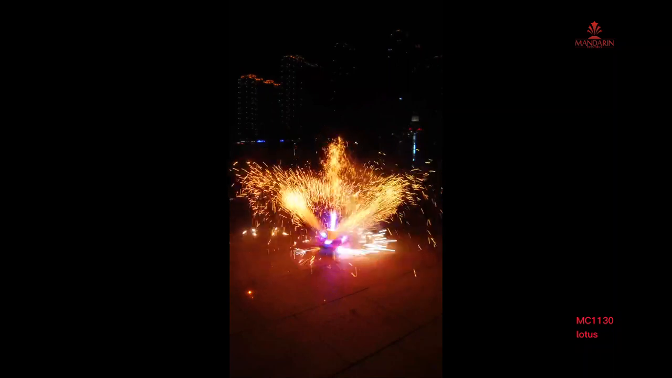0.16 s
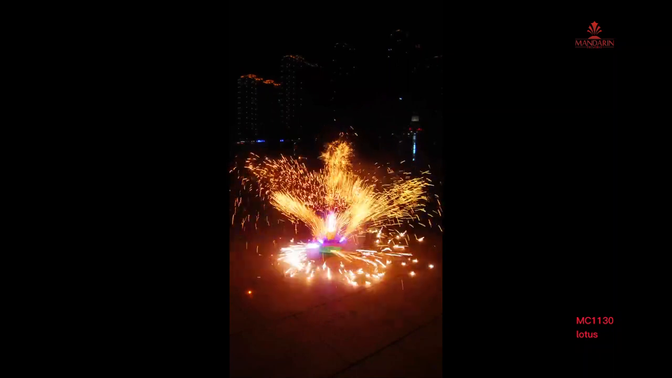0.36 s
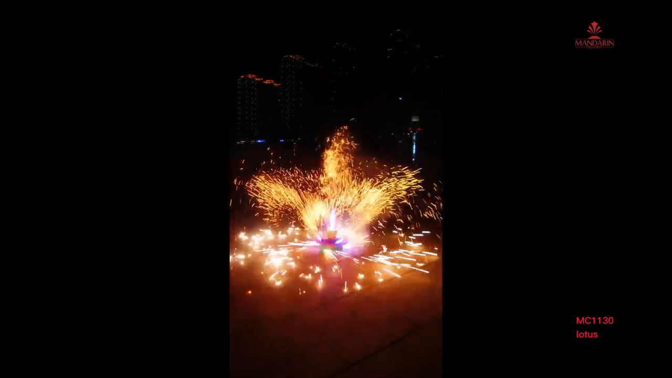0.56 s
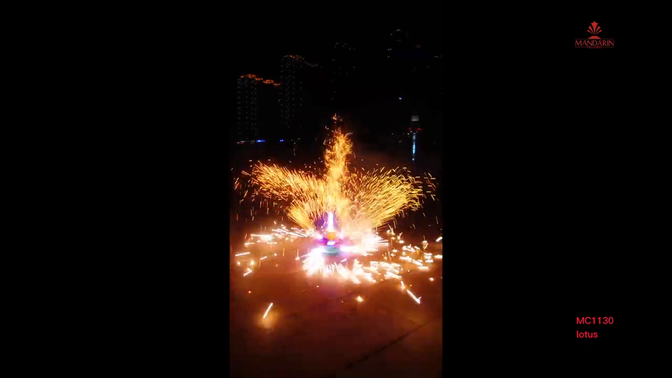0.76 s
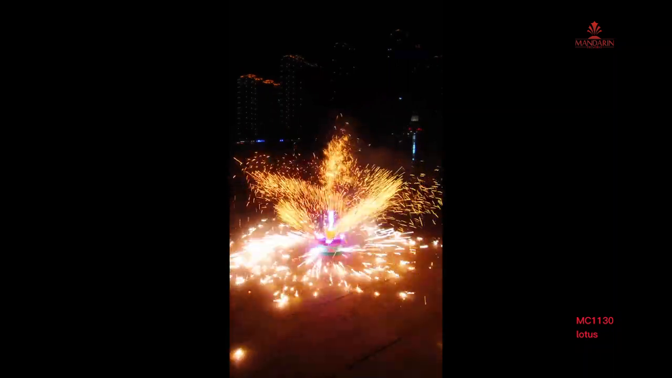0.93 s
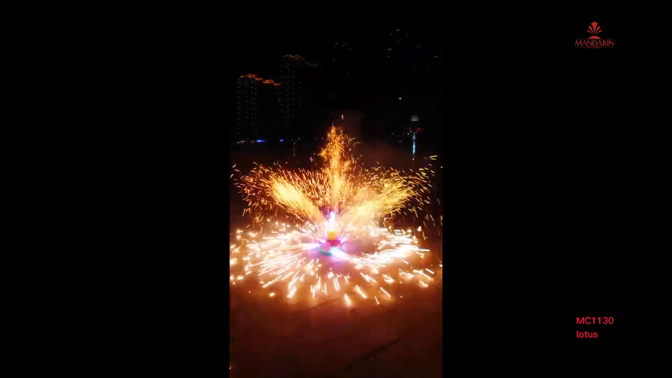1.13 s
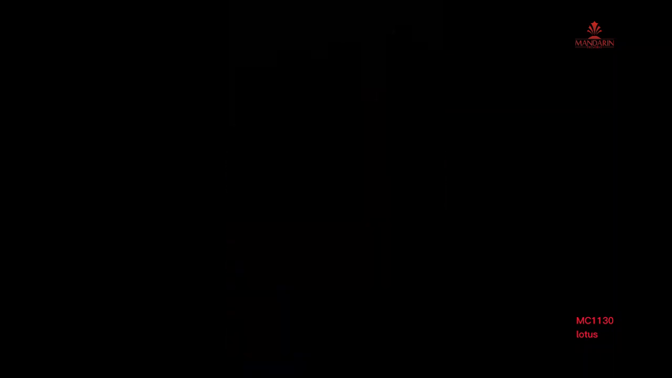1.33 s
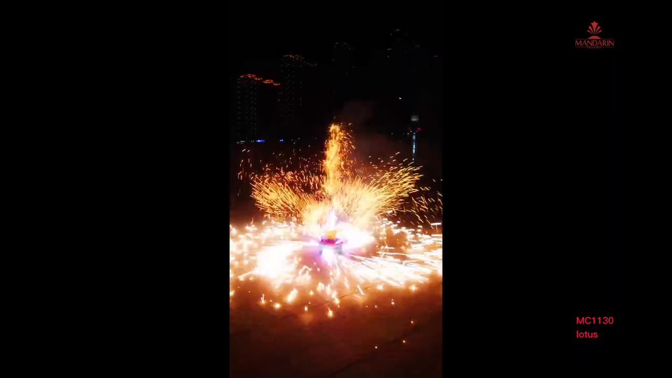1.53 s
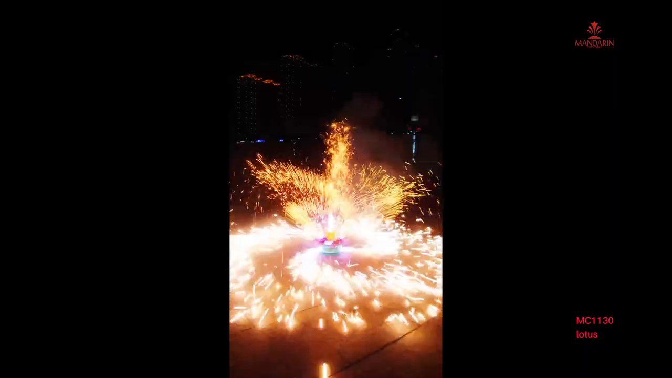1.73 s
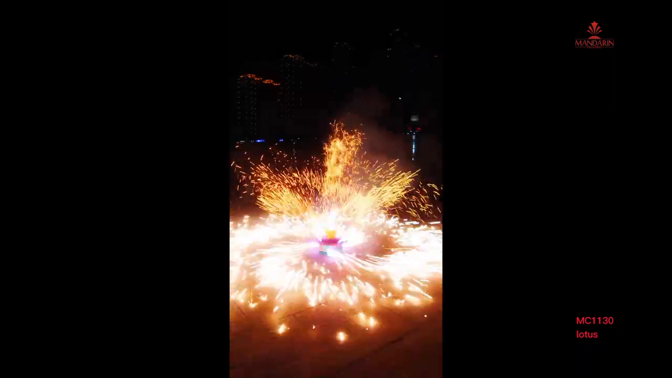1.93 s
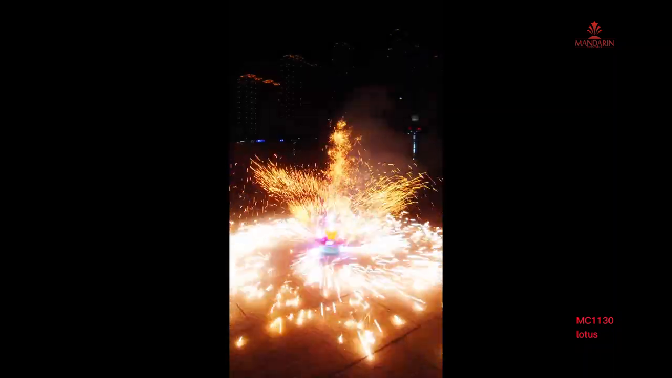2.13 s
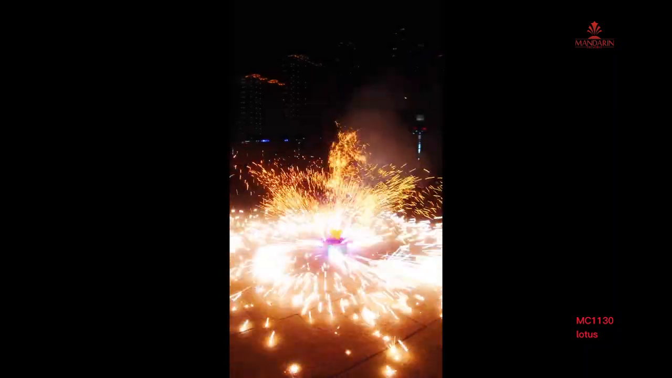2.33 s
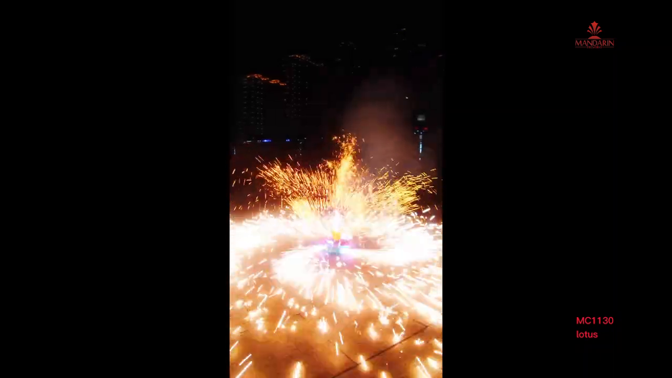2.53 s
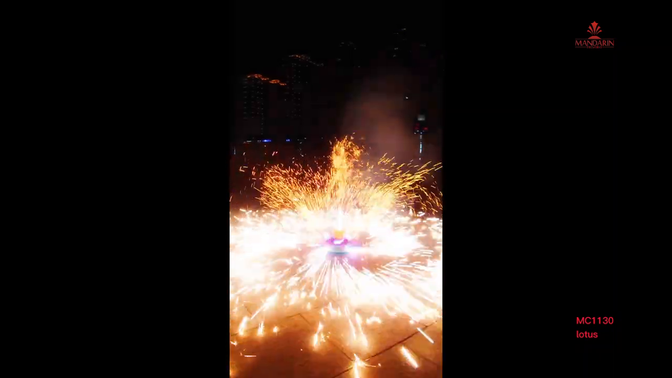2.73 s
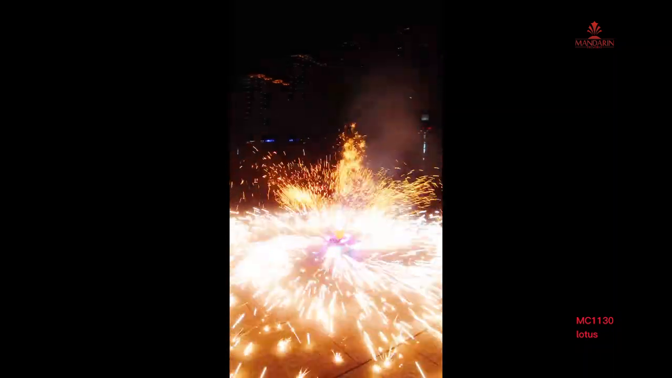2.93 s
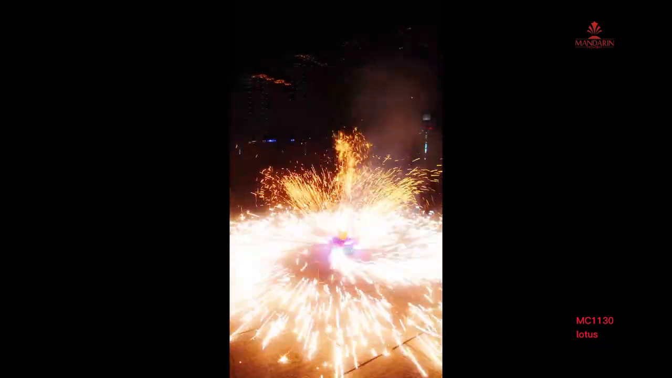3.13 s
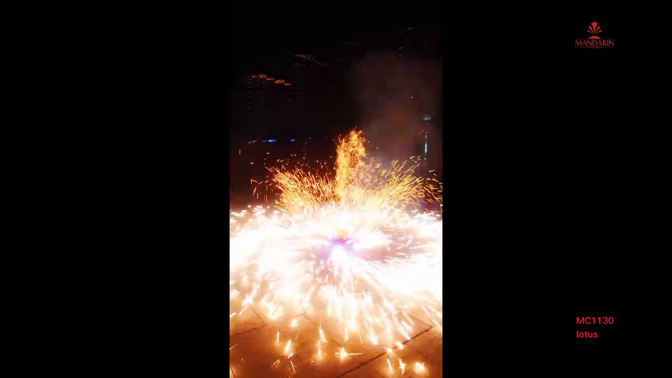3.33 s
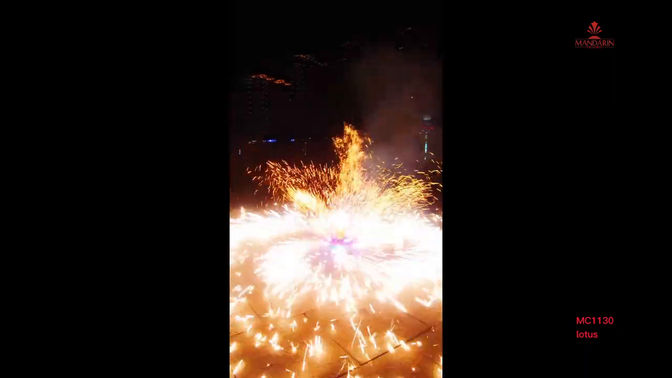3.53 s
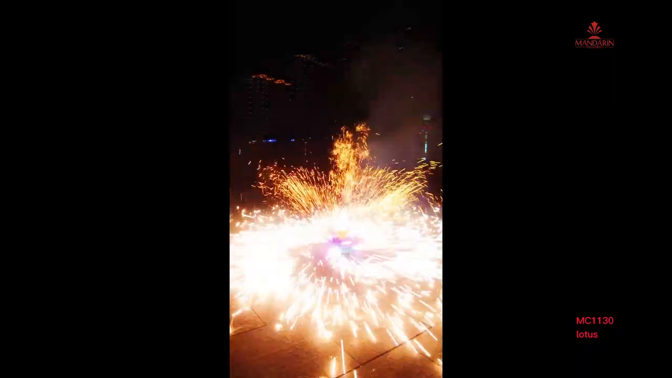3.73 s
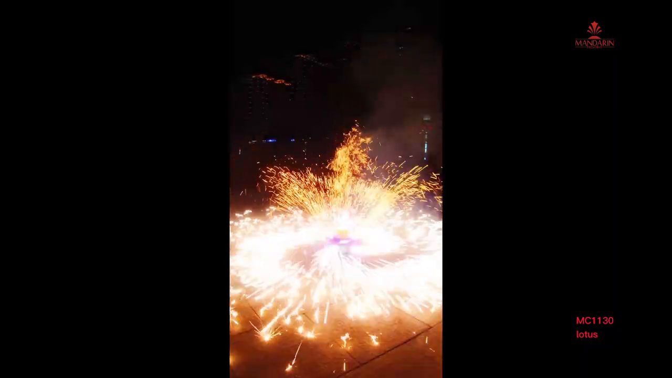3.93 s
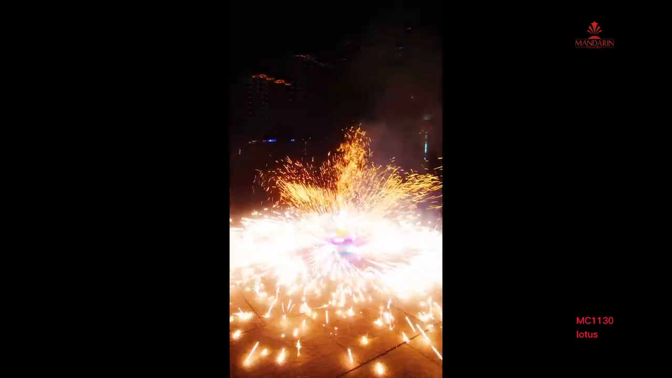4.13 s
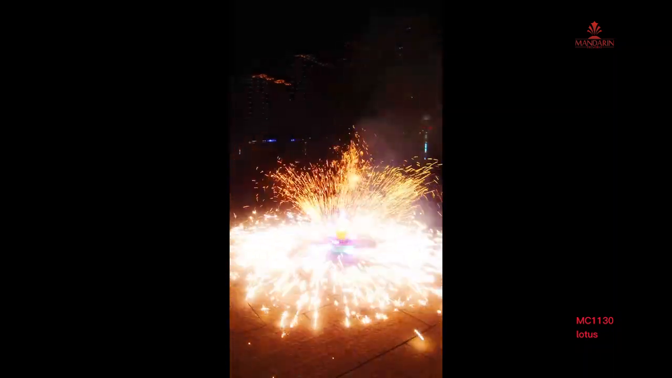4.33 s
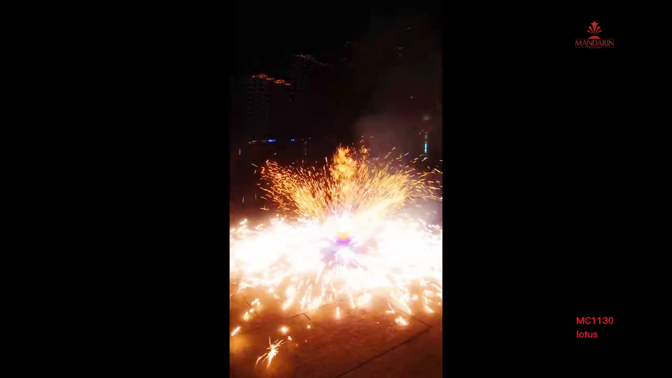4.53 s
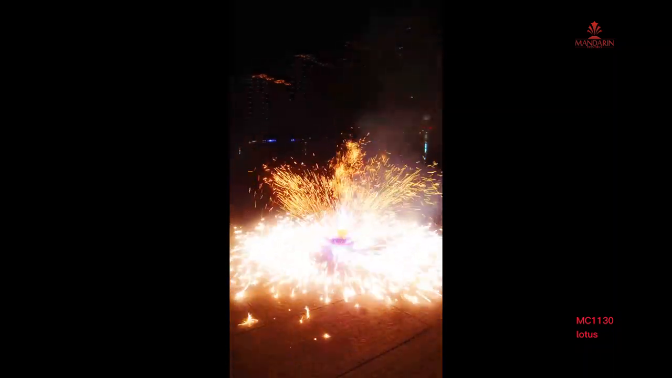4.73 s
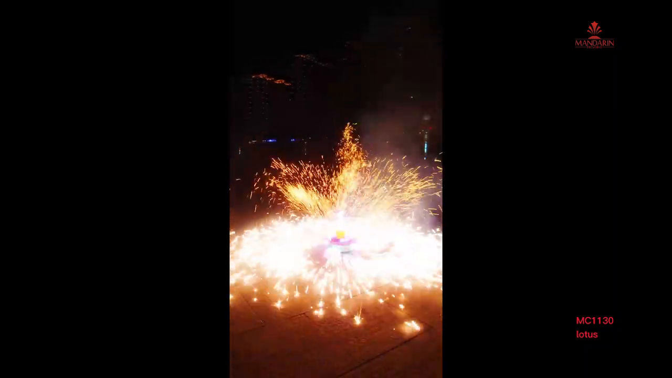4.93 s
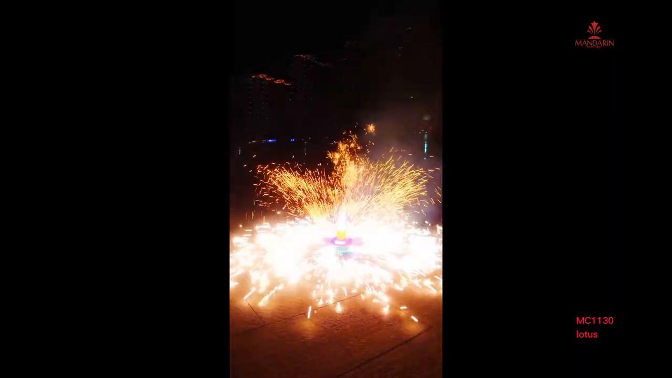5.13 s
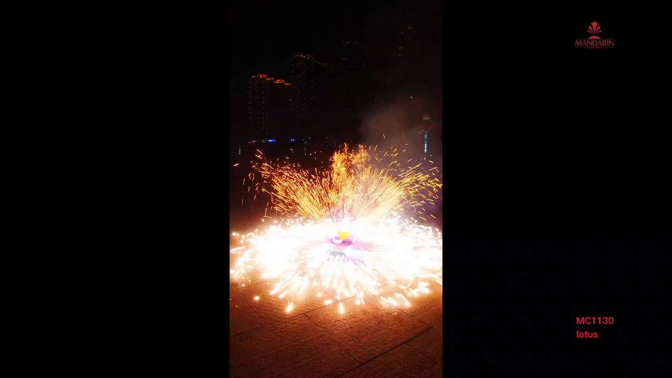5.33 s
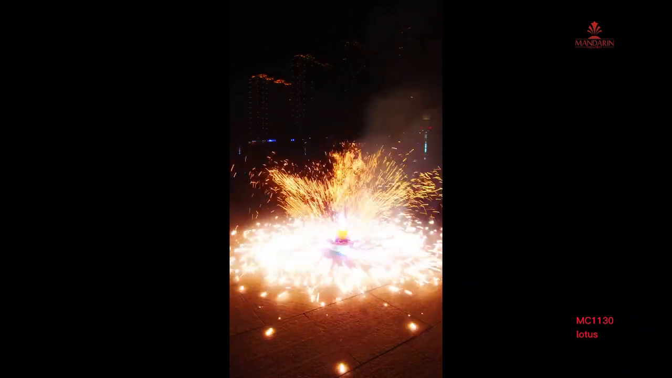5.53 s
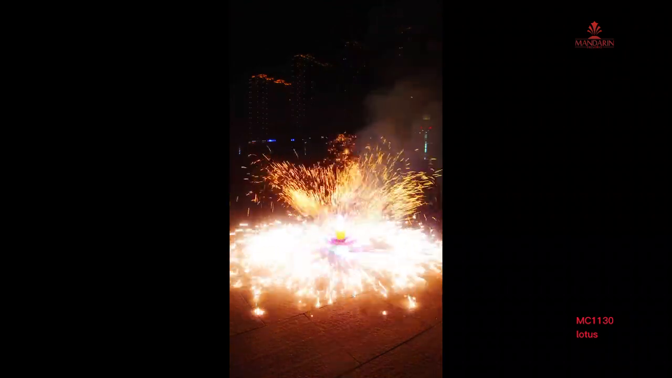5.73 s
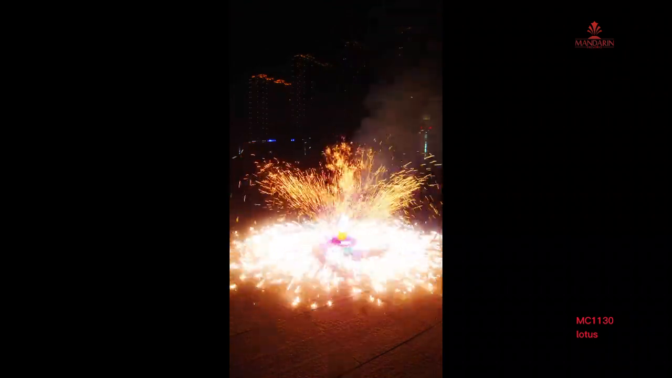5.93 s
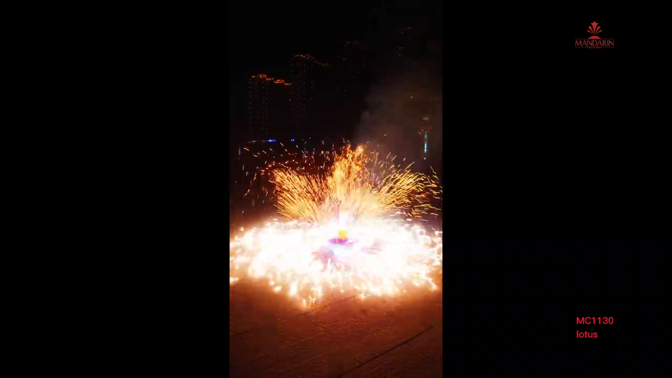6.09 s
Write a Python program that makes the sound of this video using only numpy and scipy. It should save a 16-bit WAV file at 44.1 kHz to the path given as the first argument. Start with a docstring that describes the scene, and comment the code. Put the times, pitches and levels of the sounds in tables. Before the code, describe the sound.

Out of a faint outdoor night background, a spinning ground firework sputters alight on paving a few metres away. Its jets swell into a hollow roar and hiss, and the sound cuts out for an instant. A faint whirr rises in pitch, a few sputters follow, then two brief, slightly falling whistles. Sparks fizz and crackle densely, with scattered dry snaps, as the rush slowly eases but keeps going.

```python
"""Out of a faint night background, a ground-spinner firework sputters alight on paving a few metres away.
Its turbulent gas jets swell to a hollow roar and hiss, and the wheel spins up with a faint rising whirr.
Two brief sagging whistles follow, later a faint, nearly steady tone of the spinning wheel. Bursting
sparks send out sharp pressure pulses, a dense fizz and crackle. The sound cuts out once for a moment."""
import sys
import numpy as np
from scipy import signal
from scipy.fft import rfft, irfft
from scipy.io import wavfile
from scipy.ndimage import uniform_filter1d

SR = 44100
rng = np.random.default_rng(int(sys.argv[2]) if len(sys.argv) > 2 else 0)


def dump(signal):
    """Clip the signal to [-1, 1] and save it as 16-bit WAV at the path in sys.argv[1]."""
    limited = np.clip(np.atleast_2d(signal).T, -1, 1)
    pcm = np.round(limited * 32767).astype(np.int16)
    wavfile.write(sys.argv[1], SR, pcm)


N = 276066
TIME = np.arange(N) / SR
FREQS = np.fft.rfftfreq(8192, 1 / SR)


# spectra of the low plume, the hollow roar and the hiss: (frequency [Hz], gain [dB])
PLUME_SPECTRUM = [(15, -18.5), (30, -25), (58, -6), (110, -6.5), (170, -3), (240, 2), (290, -1), (335, -10),
                  (450, -22), (900, -74.5)]
ROAR_SPECTRUM = [(150, -56), (320, -18.5), (400, -6), (500, -8), (580, -1.5), (660, 1), (790, -1),
                 (880, -7.5), (970, -22.5), (1150, -28.5), (3000, -87)]
HISS_SPECTRUM = [(500, -19), (1060, -20), (1190, -2.5), (1280, -5.5), (1500, -2.5), (2000, -0.5), (2340, 2),
                 (2640, -6), (2870, -6.5), (3150, -13.5), (3400, -19.5), (4250, -22), (4800, -35.5),
                 (6500, -56)]

def jets():
    """Jet noise: turbulent gas radiates in three bands, all modulated by one flutter."""
    plume_db, roar_db, hiss_db = jet_levels()
    flutter = walk(rate=70)
    grains = shower(rate=4900, spread_db=0, top_db=-0.5)
    gas = unit(bursts(grains, decay_s=0.0092))
    plume = noise(PLUME_SPECTRUM) * undb(plume_db + 0.48 * flutter)
    roar = noise(ROAR_SPECTRUM) * undb(roar_db + 0.7 * flutter)
    hiss = unit(colour(gas, HISS_SPECTRUM)) * undb(hiss_db + 0.923 * flutter)
    return plume + roar + hiss


# gas surges as more of the charge catches:
# (start [s], rise [s], decay [s], roar gain [dB], plume gain [dB])
GAS_SURGES = [(0.46, 0.02, 0.058, -1, 7.5), (0.86, 0.198, 0.207, 6, 9), (1.25, 0.3, 0.47, 2, 3.5),
              (1.95, 0.033, 0.4, 3, 1)]

def jet_levels():
    """Jet noise grows with gas flow: plume, roar and hiss [dB] follow the burn; surges lift the low two."""
    strength_db = burn() + 0.4251 * walk(rate=9)  # the charge burns unevenly
    weak_burn_db = np.minimum(strength_db + 11, 0)  # in a weak burn the roar dies away faster
    plume_db = -41.5 + 0.34 * strength_db
    roar_db = -30.5 + 0.3954 * strength_db + 0.58 * weak_burn_db
    hiss_db = -30 + strength_db
    for start_s, rise_s, decay_s, roar_gain_db, plume_gain_db in GAS_SURGES:
        surge = envelope(start_s, rise_s, 0, decay_s)
        plume_db += plume_gain_db * surge
        roar_db += roar_gain_db * surge
    puffs_db = 0.7675 * walk(rate=16)
    return plume_db, roar_db + puffs_db, hiss_db


# strength of the burn, as the level of the jet hiss: (time [s], level [dB])
BURN_CURVE = [(0.0, -48.0), (0.42, -47), (0.52, -45), (0.8, -43), (1.17, -38), (1.8, -34.5), (2.5, -30.5),
              (3.05, -30.5), (3.25, -32), (3.55, -30.5), (3.85, -34.0), (4.75, -36.5), (6.26, -39.5)]

def burn(delay_s=0, full_db=-30):
    """Combustion drives jets and spray: its strength delay_s earlier, in dB relative to full burn."""
    times, levels_db = np.transpose(BURN_CURVE)
    return np.interp(TIME - delay_s, times, levels_db) - full_db


# lumps of the charge flaring up: (time [s], level [dB])
FLARES = [(0.462, -26), (0.477, -25), (0.489, -24), (1.993, -16), (2.007, -16), (2.028, -16), (3.299, -24),
          (3.315, -23), (5.093, -22)]

def sputters():
    """Impulse excitation: each flare rings the hollow resonance of the roar."""
    pulses = clicks(strikes_at(FLARES), tail_s=0.019)
    return peaked(colour(pulses, ROAR_SPECTRUM), FLARES)


# spectrum of all sparks, and the added brightness of sharp ticks: (frequency [Hz], gain [dB])
SPARK_SPECTRUM = [(1500, -30), (4500, -26.5), (5300, -5), (6000, -5), (6600, -7), (8500, -11),
                  (10200, -2.5), (11300, -6.5), (12200, -8.5), (13500, -6), (14300, 0), (15300, 0.5),
                  (17000, -23)]
TICK_BRIGHTNESS = [(3500, -13.5), (6000, -2), (9000, -3.5), (15000, 4)]

def sparks():
    """Shot noise: burning grains merge into a fizz; sharper ticks come thicker as the spray grows."""
    flight_s = 0.23  # from leaving the nozzle to bursting
    growth_db = 0.778 * burn(delay_s=flight_s)
    density = undb(0.25 * (growth_db - growth_db.max()))
    grains = shower(rate=4100, spread_db=2, top_db=-2.5)
    fizz = unit(clicks(grains, tail_s=0.0063))
    strikes = shower(rate=800 * density, spread_db=5, top_db=21) / np.sqrt(density)
    ticks = unit(colour(clicks(strikes, tail_s=0.0008), TICK_BRIGHTNESS))
    spray = unit(colour(fizz + ticks, SPARK_SPECTRUM))
    spurts_db = 0.75 * walk(rate=18)
    return spray * undb(-37 + growth_db + spurts_db)


# the loudest bursting sparks: (time [s], relative level [dB])
LARGE_SPARKS = [(0.5332, -32.5), (1.0515, -26), (1.1273, -31), (1.1932, -27), (1.2466, -21.5),
                (1.28, -30.5), (2.2029, -22.5), (2.7412, -21), (3.0749, -18.5), (3.5194, -19),
                (3.8207, -22), (4.2368, -20), (4.3146, -23.5), (4.4722, -23.5), (4.5444, -23.5),
                (4.6952, -26), (5.5902, -23), (5.7389, -23)]

def snaps():
    """A short pulse has a broad spectrum: single large sparks burst with a bright, dry snap."""
    pulses = clicks(strikes_at(LARGE_SPARKS), tail_s=0.0013)
    cracks = colour(colour(pulses, TICK_BRIGHTNESS), SPARK_SPECTRUM)
    return peaked(cracks, LARGE_SPARKS) * undb(0.5)


def whirr():
    """Rotational tone: pitch rises with the wheel's speed towards a limit, then it fades into the roar."""
    start_s, spin_up_s, start_hz, top_hz = 1.42, 0.38, 480.5, 745
    age = np.maximum(TIME - start_s, 0)
    hz = top_hz - (top_hz - start_hz) * np.exp(-age / spin_up_s)
    swell = envelope(start_s, attack_s=0.142, hold_s=0.78, release_s=0.154)
    return tone(hz, waver=0.01186, flicker_db=3) * undb(-37) * swell


# two brief whistles, then the wheel's faint later tone:
# (start [s], hold [s], pitch [Hz], sag [octaves/s], level [dB])
SAGGING_TONES = [(2.423, 0.015, 1553, 0.3, -34), (2.506, 0.275, 1549, 0.34, -38.5),
                 (4.15, 0.77, 1023, 0.027, -56)]

def whistles_and_wheel_tone():
    """Aerodynamic tones: two brief sagging whistles, then a faint, nearly steady tone of the wheel."""
    out = np.zeros(N)
    for start_s, hold_s, hz, sag, db in SAGGING_TONES:
        pitch = hz * 2 ** (-sag * (TIME - start_s))
        swell = envelope(start_s, attack_s=0.0116, hold_s=hold_s, release_s=0.013)
        out += tone(pitch, waver=0.002985, flicker_db=1.3) * undb(db) * swell
    return out


# outdoor background: (frequency [Hz], gain [dB])
NIGHT_SPECTRUM = [(30, 0.5), (100, -0.5), (400, -6.5), (1100, -8.5), (2500, -14), (3800, -16.5),
                  (5000, -24.5), (8000, -20.5), (15000, -11.5)]

def night():
    """Stationary noise: a faint, steady outdoor background."""
    return noise(NIGHT_SPECTRUM) * undb(-49)


def undb(db):
    """Decibels to amplitude ratio."""
    return 10 ** (np.asarray(db) / 20)


def unit(x):
    """Normalisation to rms 1."""
    return x / np.sqrt(np.mean(x ** 2))


def peaked(x, rows):
    """Peak normalisation to the level of the loudest row."""
    return x / np.abs(x).max() * undb(max(db for _, db in rows))


def causal(x, db):
    """Minimum-phase filter with the given gains at FREQS, so that clicks ring only afterwards."""
    cepstrum = irfft(np.log(undb(db)))
    half = len(cepstrum) // 2
    cepstrum[1:half] *= 2
    cepstrum[half + 1:] = 0
    impulse_response = irfft(np.exp(rfft(cepstrum)))[:half]
    return signal.fftconvolve(x, impulse_response)[:N]


def colour(x, spectrum):
    """Spectral shaping by (frequency [Hz], gain [dB]) points."""
    hz, db = np.transpose(spectrum)
    return causal(x, np.interp(np.log(FREQS + 1), np.log(hz), db))


def noise(spectrum):
    """Filtered Gaussian noise of rms 1."""
    return unit(colour(rng.standard_normal(N), spectrum))


def walk(rate):
    """Smooth random modulation of rms 1, with rate new values a second."""
    hold = max(int(SR / rate), 1)
    steps = np.repeat(rng.standard_normal(N // hold + 1), hold)[:N]
    return unit(uniform_filter1d(steps, hold))


def shower(rate, spread_db, top_db):
    """Poisson process: rate strikes a second, their sizes spread from 0 dB towards top_db."""
    size_db = top_db * np.tanh(spread_db * rng.exponential(size=N) / top_db)
    return (rng.random(N) < rate / SR) * undb(size_db)


def strikes_at(rows):
    """Impulse train from (time [s], level [dB]) rows."""
    times, db = np.transpose(rows)
    return np.bincount((times * SR).astype(int), undb(db), N)[:N]


def bursts(strikes, decay_s):
    """Incoherent addition: each strike releases a decaying puff of noise, and their energies sum."""
    retention = np.exp(-2 / (decay_s * SR))
    energy = signal.lfilter([1], [1, -retention], strikes ** 2 + 1e-18)
    return np.sqrt(energy) * rng.standard_normal(N)


def clicks(strikes, tail_s):
    """Burst transients: a pressure spike of either sign, then a short spit of noise."""
    spikes = strikes * rng.choice([-1, 1], N)
    return unit(spikes) + undb(1.5) * unit(bursts(strikes, tail_s))


def tone(hz, waver, flicker_db):
    """Random frequency and amplitude modulation make an airy tone of rms near 1."""
    wavering_hz = hz * (1 + waver * walk(rate=120))
    phase = 2 * np.pi * np.cumsum(wavering_hz) / SR
    return np.sqrt(2) * np.sin(phase) * undb(flicker_db * walk(rate=35))


def envelope(start_s, attack_s, hold_s, release_s):
    """A linear rise to 1, a hold and an exponential decay."""
    age = TIME - start_s
    rise = np.clip(age / attack_s, 0, 1)
    return rise * np.exp(-np.maximum(age - attack_s - hold_s, 0) / release_s)


def scene():
    """Superposition: the pressures of background and firework add in open air."""
    return (night() + jets() + sputters() + sparks() + snaps() + whirr() + whistles_and_wheel_tone())[None]


# narrow peaks and notches of the microphone port: (frequency [Hz], width [Hz], gain [dB])
PORT_RESONANCES = [(3435.6, 135, -19.5), (4004, 42.7, -33.5), (5129.5, 200.5, -32.5), (5990, 348, 6.5),
                   (6836, 136.5, -23.5), (7725, 239, 8), (9017, 136, 7.5), (9640, 230, -0.5),
                   (11072, 107, 7.5)]

def record(dry):
    """Resonance in the microphone port colours the sound; it drops out briefly and is low-passed."""
    gap_start_s, gap_end_s, cutoff_hz = 1.3302, 1.4102, 15300
    port_db = sum(db * np.exp(-((FREQS - hz) / width) ** 2) for hz, width, db in PORT_RESONANCES)
    in_gap = (TIME > gap_start_s) & (TIME < gap_end_s)
    dropout = uniform_filter1d(in_gap.astype(float), size=48)
    heard = causal(dry[0], port_db) * (1 - dropout + dropout * undb(-60))
    lowpass = signal.ellip(12, 0.1, 80, cutoff_hz, fs=SR, output="sos")
    return signal.sosfilt(lowpass, heard)[None]


dry = scene()
out = record(dry)
dump(out)
```